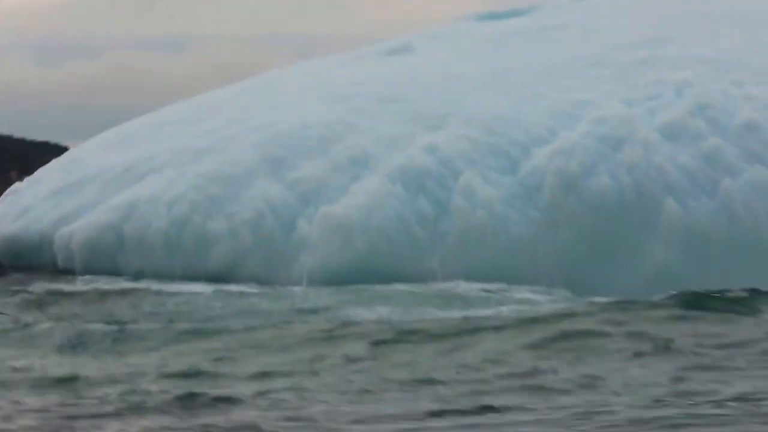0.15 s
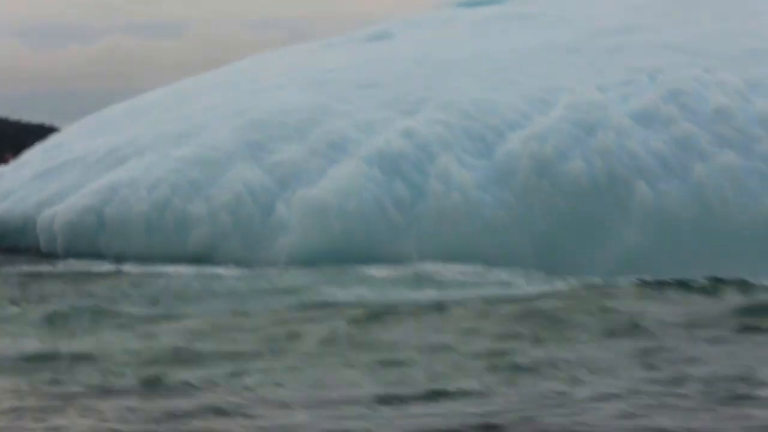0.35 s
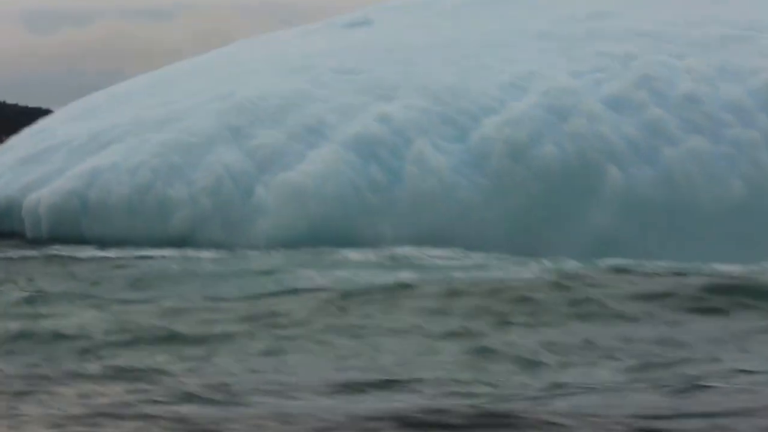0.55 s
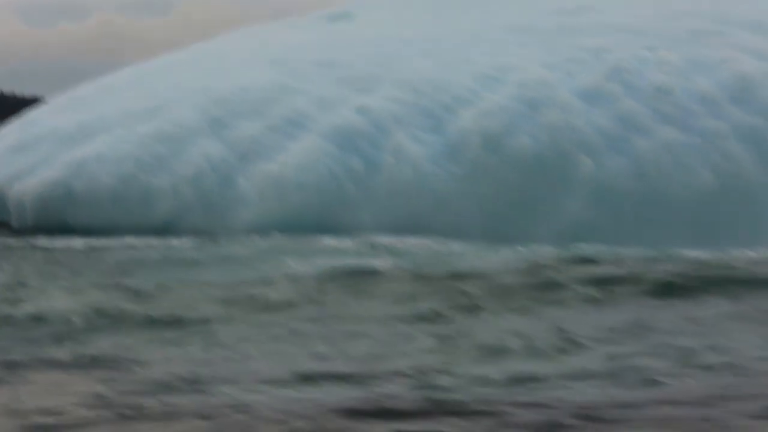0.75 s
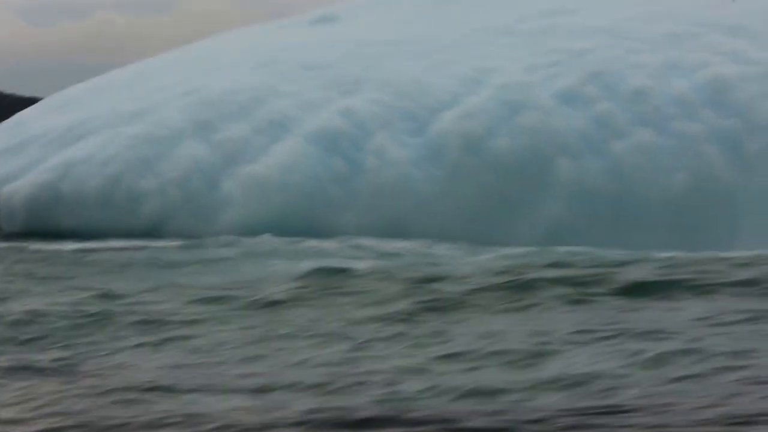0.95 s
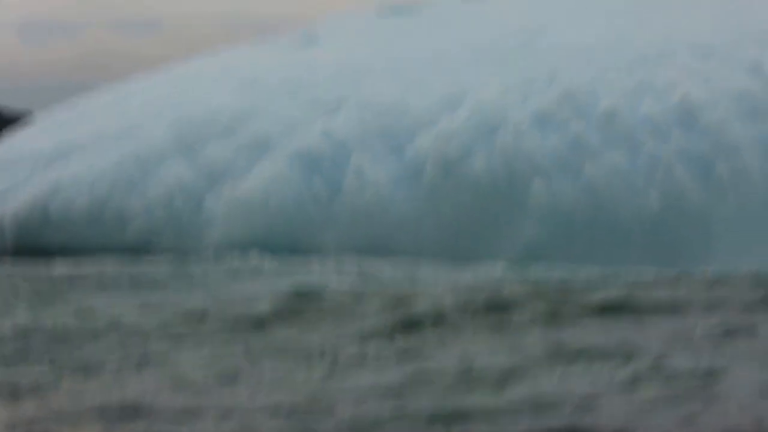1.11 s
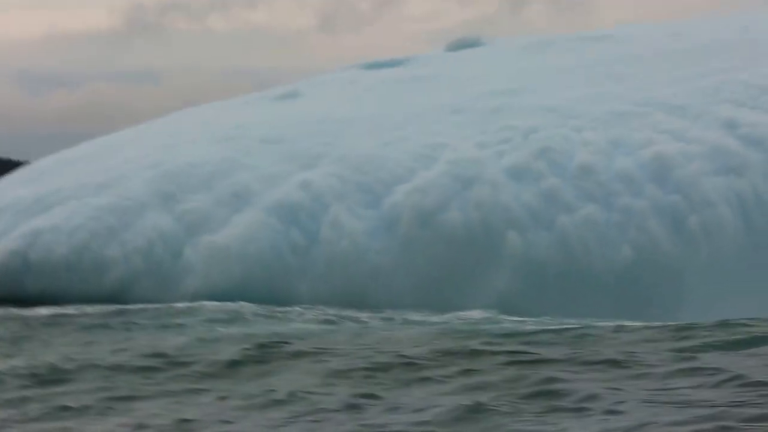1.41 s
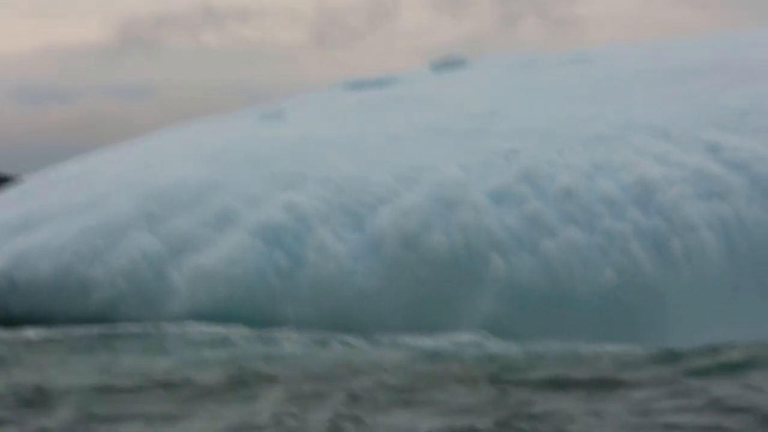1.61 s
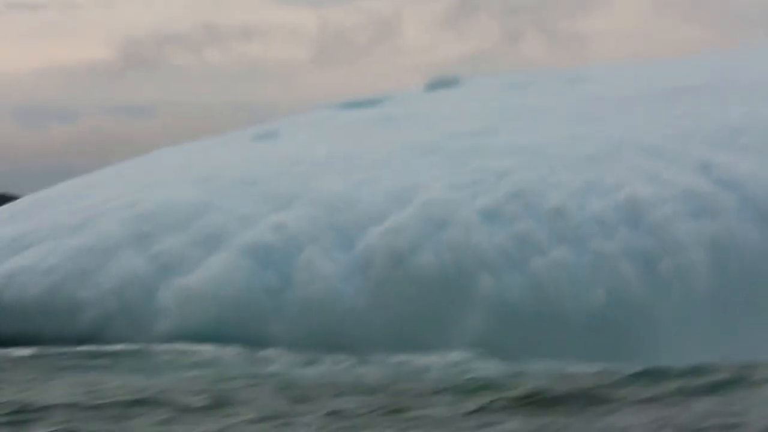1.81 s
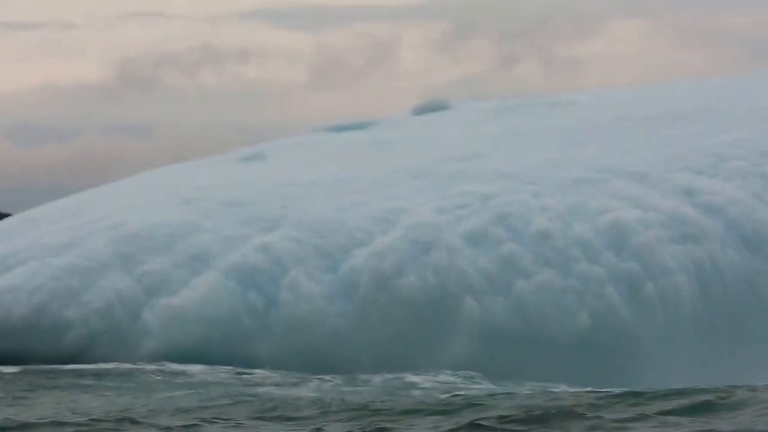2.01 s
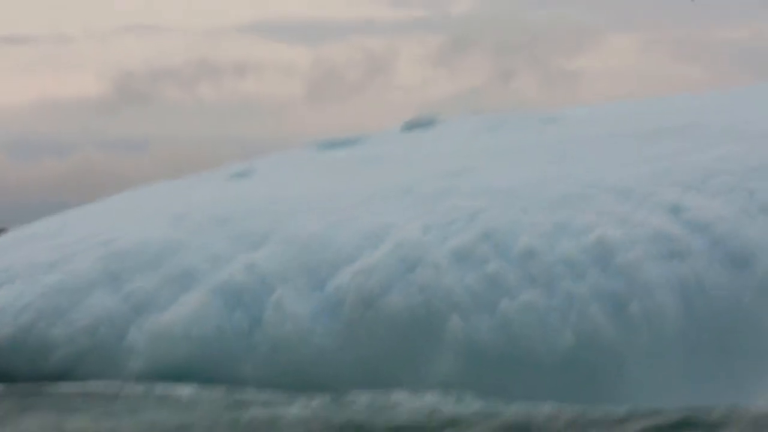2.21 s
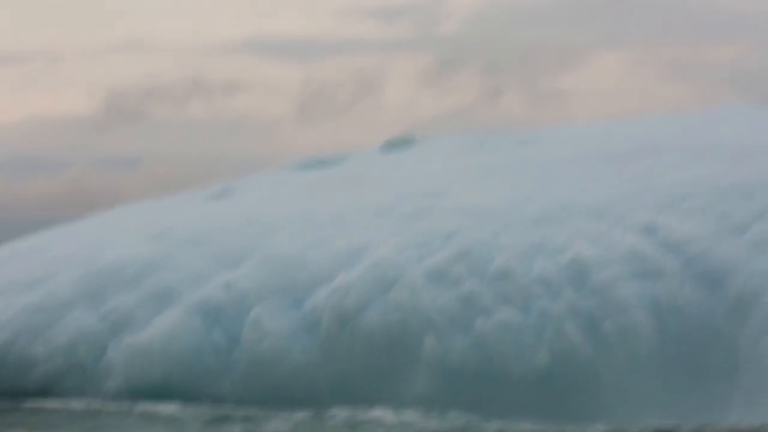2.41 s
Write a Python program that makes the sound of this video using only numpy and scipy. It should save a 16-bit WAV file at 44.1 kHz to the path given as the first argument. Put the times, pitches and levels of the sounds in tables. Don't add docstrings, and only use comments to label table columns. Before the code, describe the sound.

A boat engine idles throughout, a deep fluttering throb of about 29 pulses a second, strongest around 0.7-1.5 s, then softer. Sea water rushes and fizzes steadily alongside, with bubbling froth and small ticking drops. Low hollow gulps under the hull begin at 0.75 s; a hard spatter hits near 1.47 s, and drops cluster around 2.3 s. Wind rumbles unevenly on the onboard mono microphone outdoors.

```python
import sys
import numpy as np
from scipy import signal
from scipy.fft import rfft, irfft, next_fast_len
from scipy.io import wavfile
from scipy.ndimage import uniform_filter1d, map_coordinates

SR = 44100
rng = np.random.default_rng(int(sys.argv[2]) if len(sys.argv) > 2 else 0)


def waveform_to_disk(signal):
    frames = np.transpose(np.atleast_2d(signal))
    scaled = np.clip(frames, -1, 1) * 32767
    samples = np.round(scaled).astype(np.int16)
    wavfile.write(sys.argv[1], SR, samples)


def makeup_ratio(level_db):
    decades = np.asarray(level_db, float) / 20
    return 10 ** decades


N = 112455


def unit(x):
    return x / np.sqrt(np.mean(x ** 2) + 1e-20)


def along(points, hz):
    f, v = np.transpose(points)
    return np.interp(np.log(hz + 1), np.log(f + 1), v)


def curves(rows):
    s, *columns = np.transpose(rows)
    return [np.interp(np.arange(N) / SR, s, column) for column in columns]


def wobble(rate):
    knots = rng.standard_normal(400)
    return map_coordinates(knots, [np.clip(np.arange(N) * rate / SR, 0, 399)])


def filtered(x, response):
    lead = 2048
    wide = np.pad(x, lead, mode="reflect")
    m = next_fast_len(len(wide))
    spectrum = rfft(wide, m) * response(np.fft.rfftfreq(m, 1 / SR))
    return irfft(spectrum, m)[lead:lead + N]


def rush(spectrum, patchy_db):
    z = signal.stft(rng.standard_normal(N + 512), nperseg=512)[2]
    field = uniform_filter1d(rng.standard_normal(z.shape), size=8, axis=0)
    field = uniform_filter1d(field, size=5, axis=1)
    noise = signal.istft(z * makeup_ratio(patchy_db * unit(field)), nperseg=512)[1][:N]
    return unit(filtered(noise, lambda hz: makeup_ratio(along(spectrum, hz))))


def bubbles(start_s, level_db, pitch_hz, cycles, rise=.001):
    step = np.arange(500)
    turns = pitch_hz[:, None] * step / SR
    decay = np.exp(-1.3 * turns / cycles[:, None])
    onset = 1 - np.exp(-1.8 * turns)
    shape = decay * onset * np.sin(2 * np.pi * turns * (1 + rise * turns))
    at = (np.round(start_s * SR).astype(int)[:, None] + step).ravel()
    return np.bincount(at, (makeup_ratio(level_db)[:, None] * shape).ravel(), minlength=N)[:N]


# (time [s], level [dB])
WIND_GUSTS = [(0, 1), (.3, 1.5), (.6, -1.5), (.77, 2), (1.07, -1.5), (1.25, 3), (1.5, 0.5), (1.75, 1.5),
              (1.9, 0.5), (2.05, 3), (2.25, 2), (2.55, 2.5)]
# (frequency [Hz], level [dB per Hz])
WIND_SPECTRUM = [(8, -77), (18, -29), (27, -3), (40, 4), (70, 3), (150, 1), (300, -8), (700, -36.5)]


def wind():
    gust_db, = curves(WIND_GUSTS)
    return makeup_ratio(-27.5 + gust_db + 0.58 * wobble(9.9)) * rush(WIND_SPECTRUM, patchy_db=-1.0)


# (time [s], peak level [dB], pitch [Hz], half length [s])
AIR_GULPS = [
    (0.754, -20, 94, 0.031),
    (1.3, -21.5, 155, 0.033),
    (1.621, -24.5, 97.8, 0.06),
    (1.7, -25, 144, 0.048),
    (2.032, -27, 104, 0.032),
    (2.27, -25.5, 152.2, 0.055),
    (2.37, -31.5, 281, 0.074),
    (2.51, -25, 111.4, 0.035),
]


def gulps():
    t = np.arange(N) / SR
    sag_per_s = 4.4
    total = np.zeros(N)
    for s, db, hz, half_s in AIR_GULPS:
        since = t - s
        swell = np.exp(-(since / half_s) ** 2)
        turns = hz * since * (1 - sag_per_s * np.clip(since, -.15, .15) / 2)
        total += makeup_ratio(db) * swell * np.sin(2 * np.pi * turns)
    return total


# (time [s], level over the flow [dB])
FROTH_CHURN = [(0, -9), (.3, -8), (.45, -9.5), (.62, -6), (.75, -10), (1.0, -10), (1.2, -9), (1.6, -13.5),
               (1.9, -9.5), (2.15, -11), (2.55, -6)]
# (frequency [Hz], level [dB per Hz])
FROTH_SPECTRUM = [(500, -40), (760, -8), (900, 0), (1050, -1), (1250, -8), (1800, -40)]


def froth(flow_db):
    churn_db, = curves(FROTH_CHURN)
    return makeup_ratio(flow_db + churn_db + 0.85 * wobble(13)) * rush(FROTH_SPECTRUM, patchy_db=4.0)


# (frequency [Hz], level [dB per Hz])
BODY_SPECTRUM = [(180, -41), (300, -3), (370, -5), (426, 0), (584, -3), (700, -1), (1600, -22.5),
                 (2080, -34), (3520, -120)]


def body(flow_db, splash_db):
    level_db = flow_db - 1 + 0.17 * splash_db + 0.85 * wobble(11.33)
    return makeup_ratio(level_db) * rush(BODY_SPECTRUM, patchy_db=.5)


def spray():
    count = 2500
    start_s = rng.random(count) * N / SR
    pitch_hz = np.clip(3790 * np.exp(0.438 * rng.standard_normal(count)), 1200, 9500)
    return unit(bubbles(start_s, np.zeros(count), pitch_hz, np.full(count, 1.5)))


# (frequency [Hz], level [dB per Hz])
FIZZ_SPECTRUM = [(590, -5), (1000, -5), (1580, -6.5), (4580, -15.5), (8500, -34.5), (11000, -60),
                 (18700, -120)]


def fizz(flow_db, spray_db, splash_db):
    hiss = rush(FIZZ_SPECTRUM, patchy_db=0.45) + makeup_ratio(-10.5) * spray()
    return makeup_ratio(flow_db - 5 + spray_db + splash_db + 0.13 * wobble(25.23)) * hiss


# (time [s], level over the fizz [dB], length [s])
SMALL_SPLASHES = [(.21, 3, .014), (.235, 2, .008), (.29, 2.5, .018), (.5, 2.5, .012), (.78, 2.5, .01),
                  (.91, 2, .015), (1.24, 3, .015), (1.39, 2.5, .015), (1.44, 2, .01), (1.52, 2, .01),
                  (2.08, 2, .015), (2.26, 2, .012), (2.4, 2, .015)]


def splashes():
    t = np.arange(N) / SR
    return sum(db * np.exp(-((t - s) / length_s) ** 2) for s, db, length_s in SMALL_SPLASHES)


# (time [s], peak level [dB], pitch [Hz], life [cycles])
WATER_DROPS = [(.1685, -28, 2900, 5), (.2135, -30, 8300, 5), (.2137, -33, 9300, 4), (.234, -33, 8500, 5),
               (.3576, -34, 6500, 5), (.4628, -34, 6500, 5), (.502, -28, 4700, 7), (.683, -29, 4600, 6),
               (.7795, -24, 4700, 9), (.7797, -28, 5200, 5), (.8021, -27, 3000, 5), (.9058, -27, 3300, 5),
               (1.1049, -29, 2700, 5), (1.168, -31, 6200, 7), (1.171, -30, 5000, 6), (1.2291, -28, 3400, 4),
               (1.2315, -30, 7000, 4), (1.2515, -26, 5000, 5), (1.335, -22, 1300, 8), (1.425, -29, 5200, 6),
               (1.4411, -31, 6200, 5), (1.4682, -15, 3200, 3), (1.4684, -17, 4500, 4),
               (1.4684, -25, 6600, 4), (1.4685, -29, 7600, 4), (1.4945, -33, 7300, 6),
               (1.4975, -32, 6900, 7), (1.504, -28, 7300, 6), (1.5042, -31, 6200, 4), (1.87, -24, 1600, 6),
               (1.9779, -27, 3400, 5), (2.08, -22, 1550, 8), (2.1535, -26, 3050, 5), (2.2598, -30, 6700, 5),
               (2.293, -20, 4400, 7), (2.2932, -23, 5000, 6), (2.298, -26, 3400, 5), (2.3138, -19, 3000, 6),
               (2.314, -18, 3500, 7), (2.3142, -26, 4400, 3), (2.317, -24, 3200, 6), (2.329, -29, 6500, 6),
               (2.384, -26, 3300, 8), (2.394, -25, 4650, 11), (2.424, -21, 4600, 4), (2.4242, -27, 5200, 4),
               (2.4833, -28, 2700, 5)]


def drops():
    return bubbles(*np.transpose(WATER_DROPS))


# (time [s], flow level [dB], spray over its usual share [dB])
WASH_FLOW = [(0, -29.6, 1), (.12, -28.8, .2), (.24, -27.4, 0), (.38, -28.7, 1.1), (.5, -27.2, -.8),
             (.66, -28.6, 1.2), (.85, -27.8, .2), (1.0, -28.2, -.8), (1.08, -29.6, .2), (1.24, -26.6, .2),
             (1.33, -28, 1), (1.43, -27, 2), (1.56, -27.8, 0), (1.8, -28.5, -.7), (1.95, -26.5, -.2),
             (2.14, -25.2, -.7), (2.3, -26.9, -.3), (2.4, -27, -.6), (2.55, -27.2, -.8)]


def sea():
    flow_db, spray_db = curves(WASH_FLOW)
    splash_db = splashes()
    return body(flow_db, splash_db) + froth(flow_db) + fizz(flow_db, spray_db, splash_db) + drops()


# (time [s], firing rate [Hz], level [dB], hull lean [dB])
ENGINE_IDLE = [(0, 28.93, -19.5, -4), (.2, 28.93, -19, -6), (.5, 28.95, -17.3, -6), (.68, 28.95, -16.5, 4),
               (.79, 28.95, -16.8, -2), (1.0, 28.97, -16.3, 4), (1.3, 29.0, -16, 1),
               (1.5, 29.02, -16.3, -1), (1.7, 29.05, -18.3, -1), (1.82, 29.05, -18.8, 4),
               (2.09, 28.95, -18.5, 7), (2.24, 28.92, -20, 1), (2.55, 28.92, -19.3, 4)]
# (time [s], panel hum [dB], hull lead [rad])
PANEL_HUM = [(0, -10, -.8), (.15, -8, -.9), (.4, 2.5, -.8), (.62, 1, -1), (.8, 1, .6), (1.1, -2, .2),
             (1.5, -3, -.2), (1.85, 2.5, -1.1), (2.1, 3, -2.3), (2.3, 4, -1.8), (2.55, 7.5, -.8)]
# (multiple of the firing rate, level [dB], share of lean, share of hum)
THROB_ORDERS = [
    (1, 0, 0, 0),
    (2, -10, -1, 0),
    (3, -15.5, 1.1, 0),
    (4, -25, .7, .8),
    (5, -25, .3, .3),
    (6.5, -21.5, 0, 1),
    (7.75, -21, 0, 1),
]


def engine():
    rate_hz, level_db, lean_db = curves(ENGINE_IDLE)
    hum_db, lead_rad = curves(PANEL_HUM)
    first_firing_s = 0.02264
    phase = 2 * np.pi * (np.cumsum(rate_hz) / SR - first_firing_s * rate_hz[0])
    throb = np.zeros(N)
    for k, db, follows_lean, follows_hum in THROB_ORDERS:
        unsteady_db = .9 * np.log(k) * wobble(9.2)
        order_db = db + follows_lean * lean_db + follows_hum * hum_db + unsteady_db + .6 * 0
        flutter = makeup_ratio(.6 * wobble(3.6))
        drift_rad = (k - 1) * .16 * wobble(4.234)
        throb += makeup_ratio(order_db) * flutter * np.cos(k * phase + (k > 1) * lead_rad + drift_rad)
    return -np.sqrt(2) * makeup_ratio(level_db) * throb


def scene():
    return (wind() + gulps() + sea() + engine())[None]


def low_pass(x):
    return signal.sosfilt(signal.butter(12, 13760, fs=SR, output="sos"), x)


def record(dry):
    top_hz = SR / 4

    def band_edge(hz):
        soft = 1 / (1 + np.exp(np.clip((hz - 9810) / 670, -50, 50))) ** 2
        return soft * np.clip((top_hz + 200 - hz) / 800, 0, 1)

    def mirror_fall(hz):
        return (hz > top_hz) * makeup_ratio(-5 - 12.5 * (hz - top_hz) / 1000)

    kept = filtered(dry[0], band_edge)
    folded = kept * 2 * np.cos(4 * np.pi * top_hz * np.arange(N) / SR)
    mirror = filtered(folded, mirror_fall)
    return low_pass((kept + mirror)[None])


dry = scene()
out = record(dry)
waveform_to_disk(out)
```